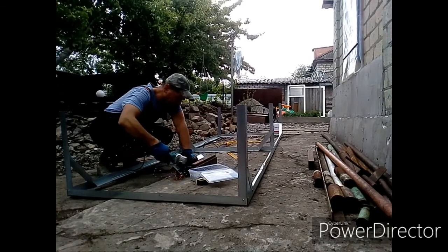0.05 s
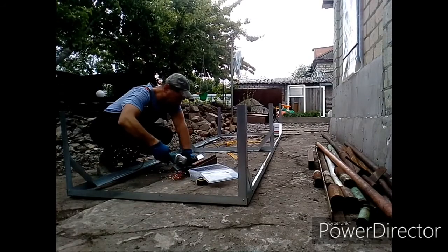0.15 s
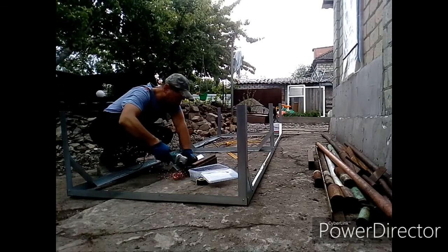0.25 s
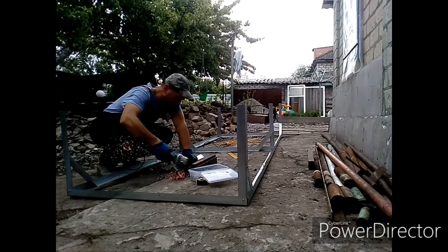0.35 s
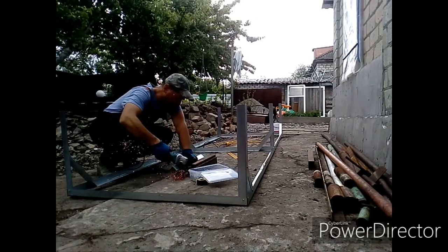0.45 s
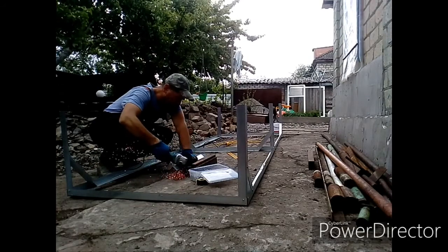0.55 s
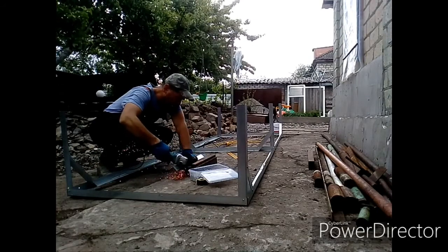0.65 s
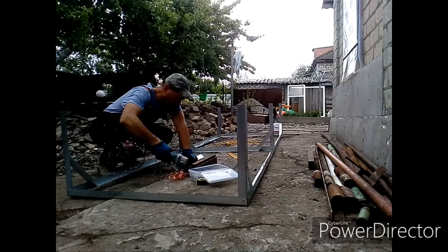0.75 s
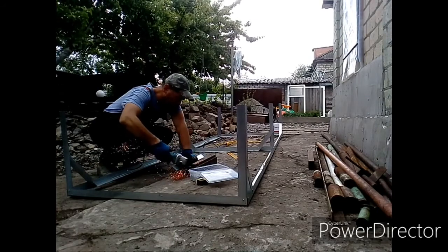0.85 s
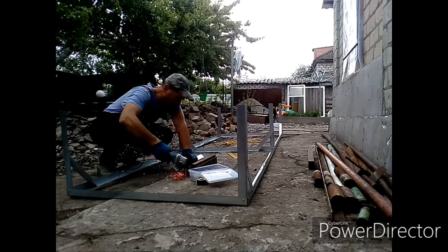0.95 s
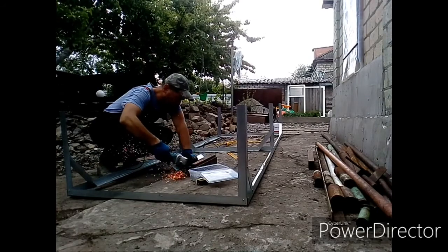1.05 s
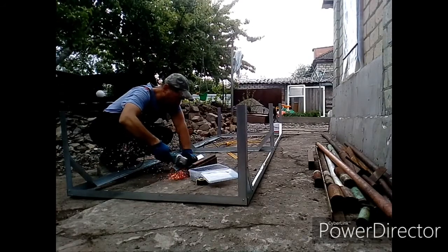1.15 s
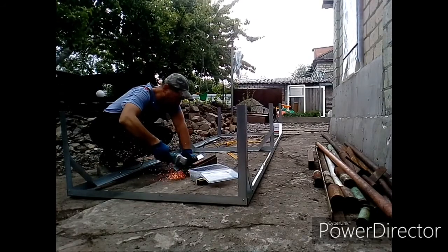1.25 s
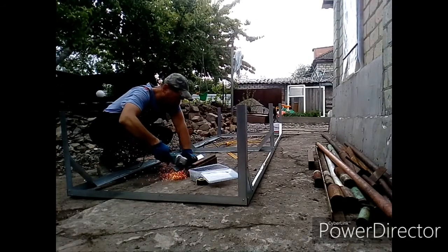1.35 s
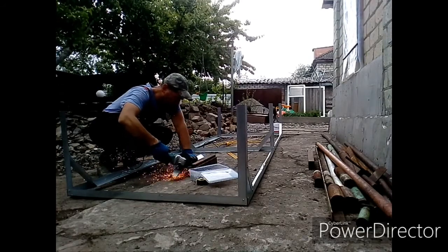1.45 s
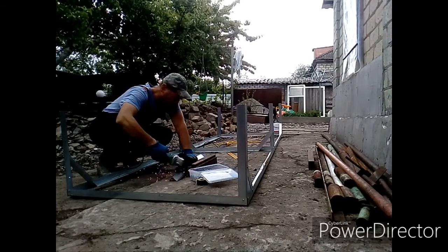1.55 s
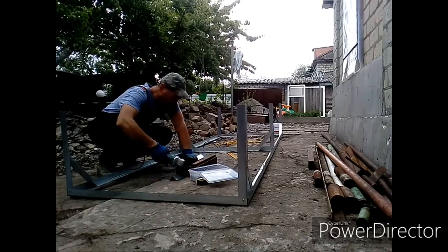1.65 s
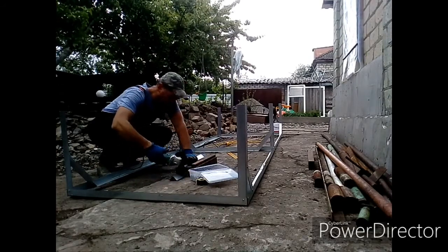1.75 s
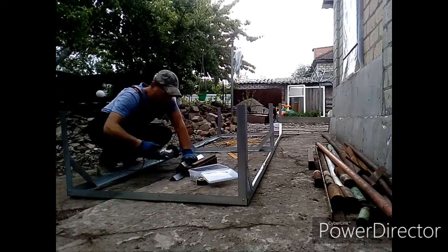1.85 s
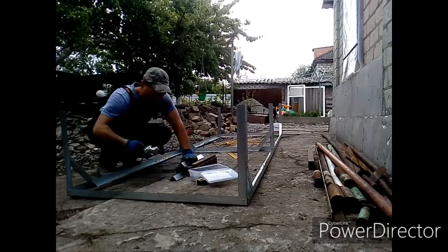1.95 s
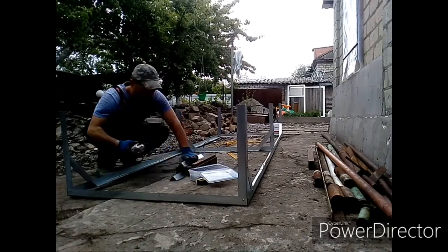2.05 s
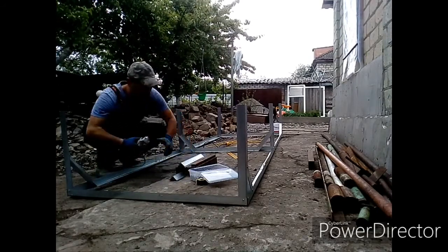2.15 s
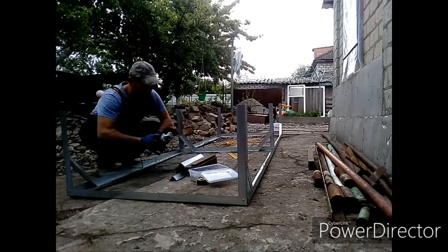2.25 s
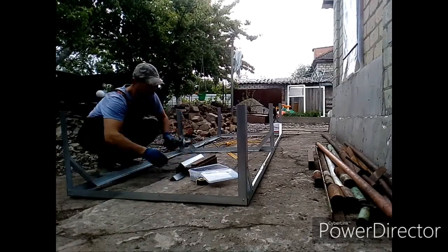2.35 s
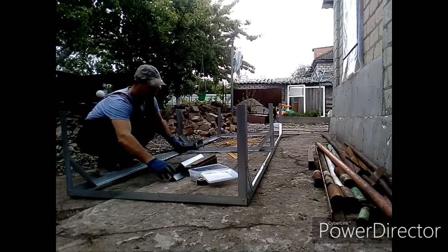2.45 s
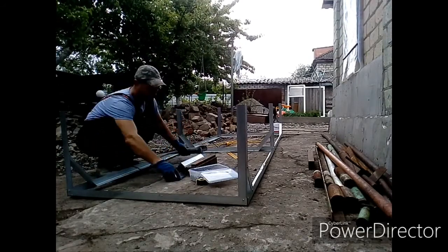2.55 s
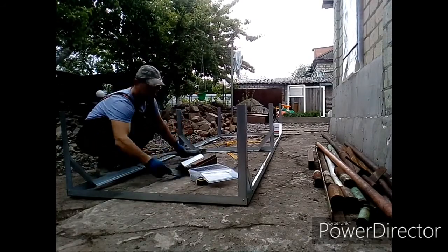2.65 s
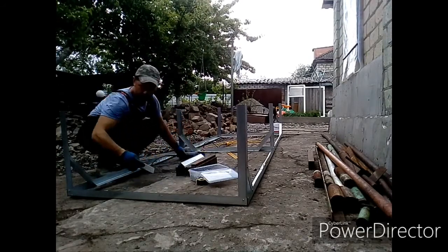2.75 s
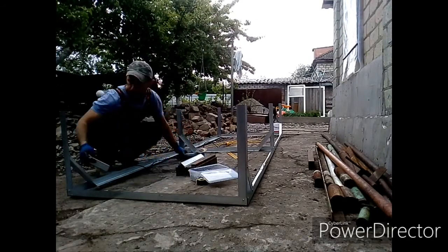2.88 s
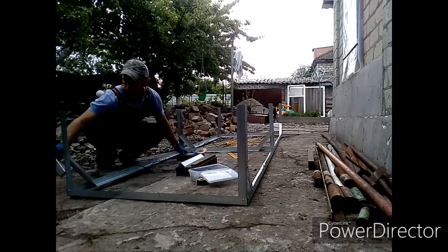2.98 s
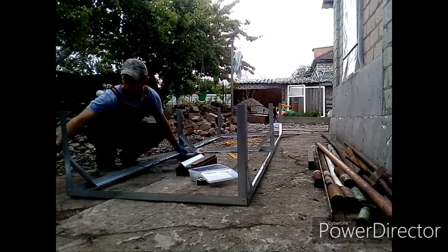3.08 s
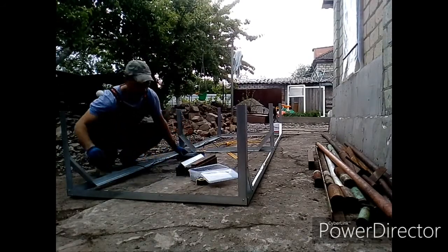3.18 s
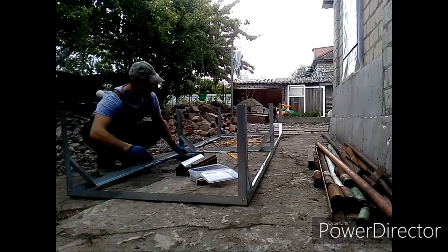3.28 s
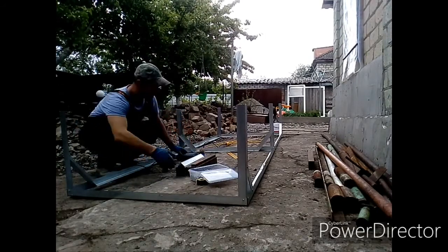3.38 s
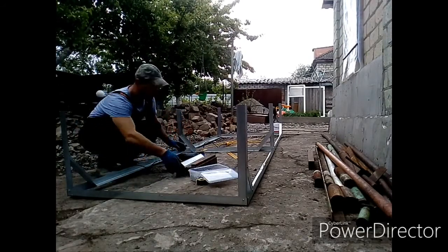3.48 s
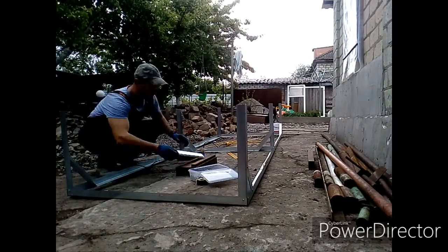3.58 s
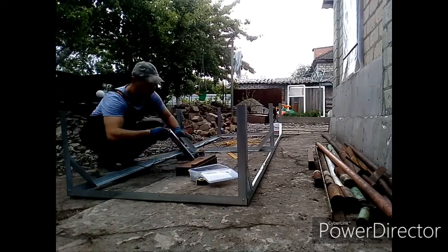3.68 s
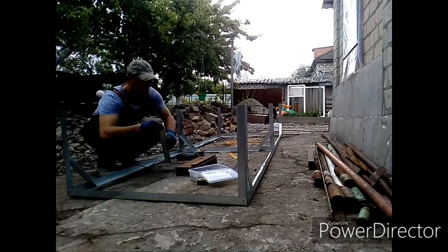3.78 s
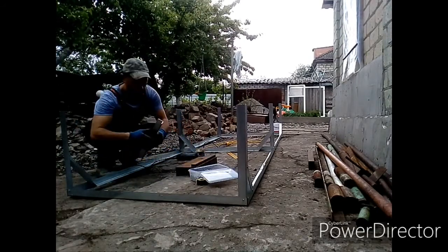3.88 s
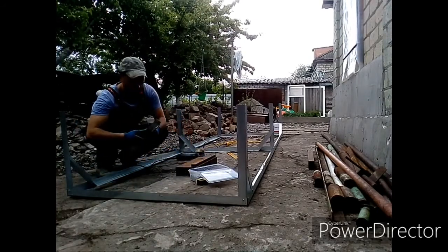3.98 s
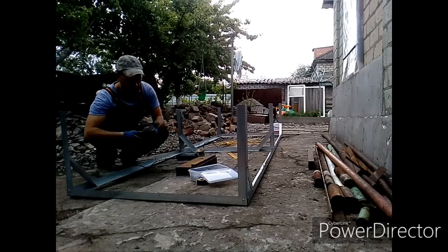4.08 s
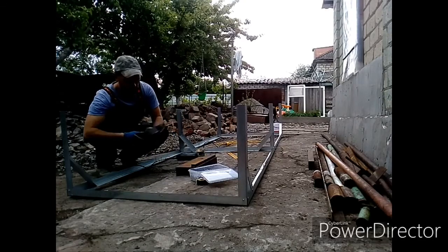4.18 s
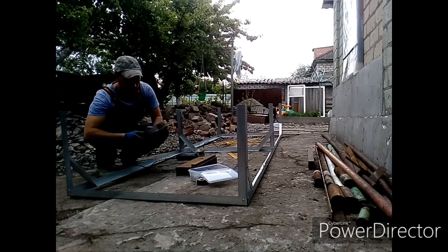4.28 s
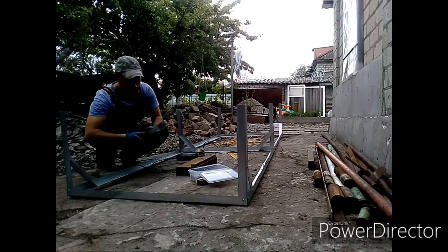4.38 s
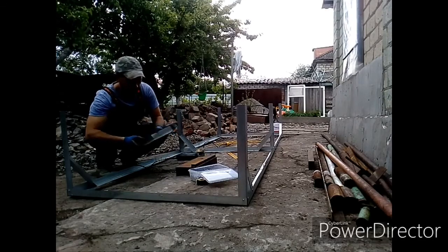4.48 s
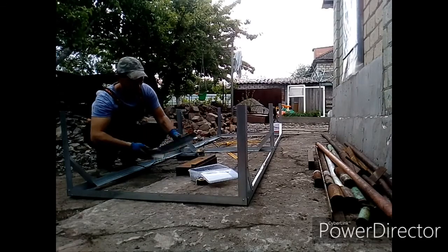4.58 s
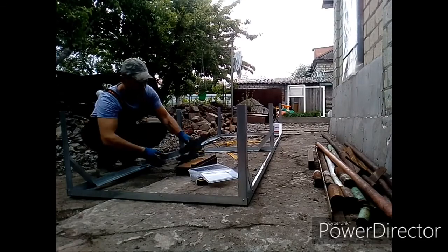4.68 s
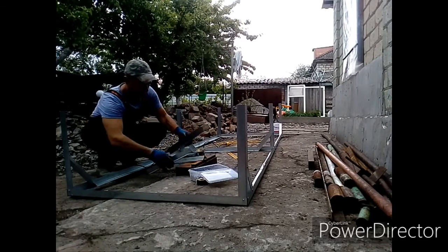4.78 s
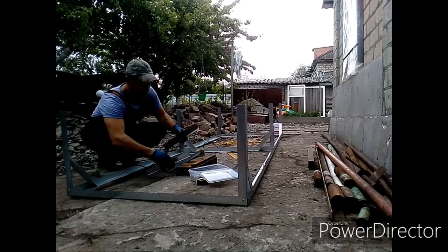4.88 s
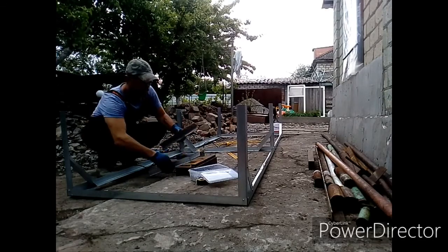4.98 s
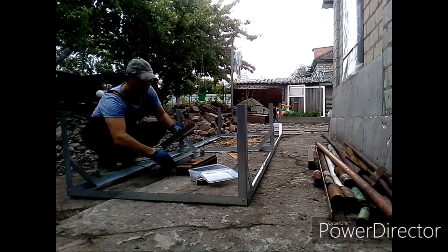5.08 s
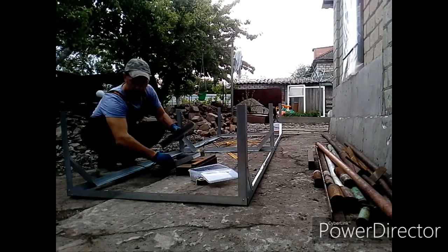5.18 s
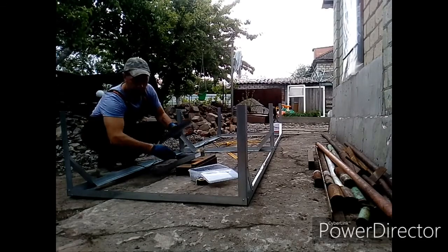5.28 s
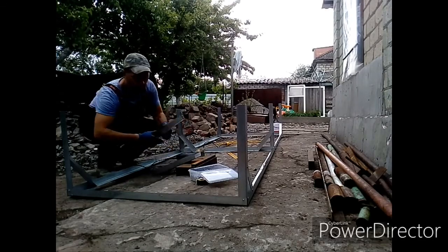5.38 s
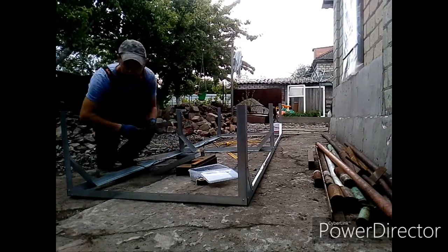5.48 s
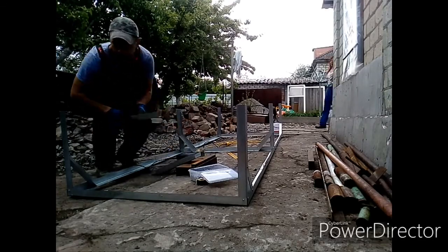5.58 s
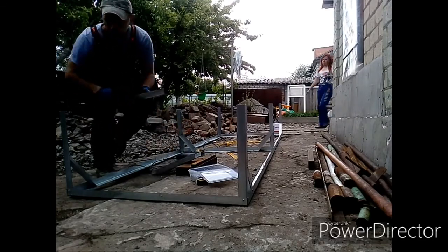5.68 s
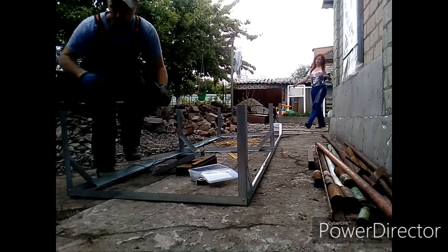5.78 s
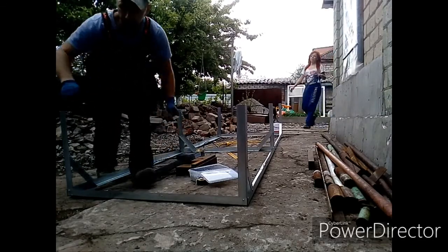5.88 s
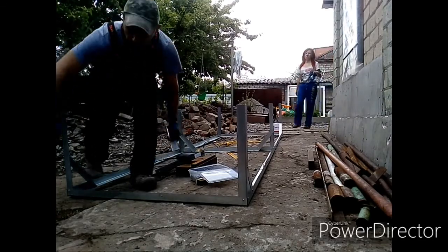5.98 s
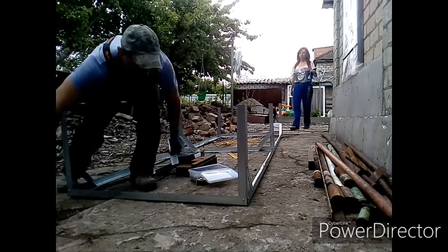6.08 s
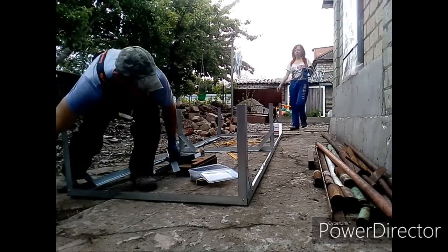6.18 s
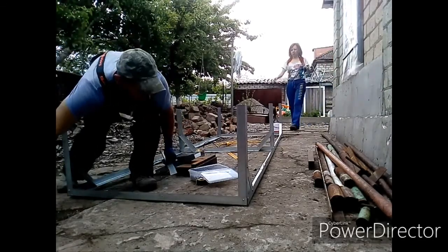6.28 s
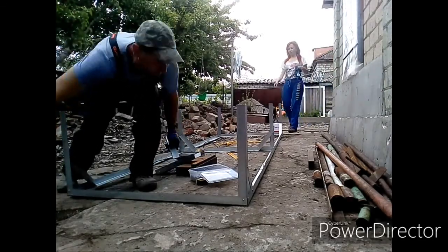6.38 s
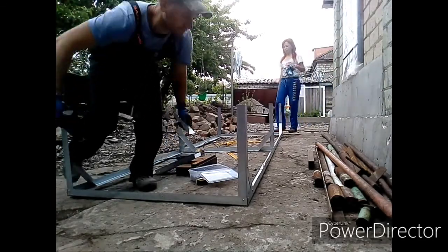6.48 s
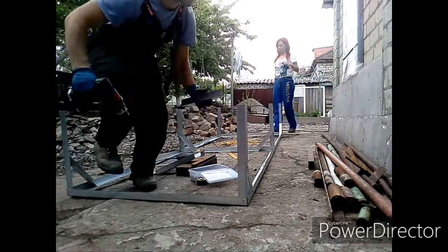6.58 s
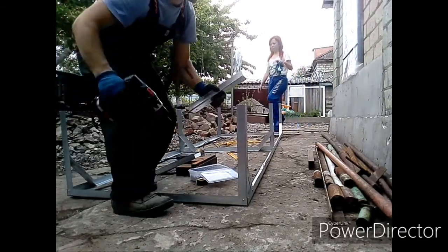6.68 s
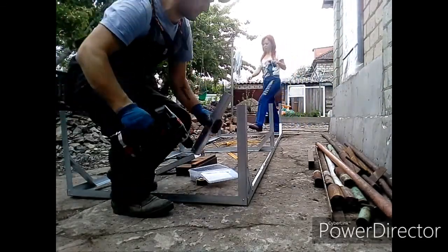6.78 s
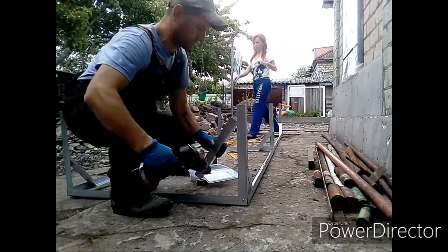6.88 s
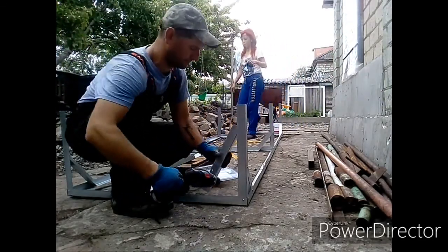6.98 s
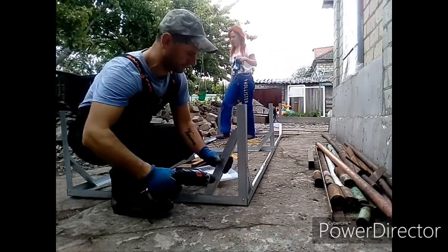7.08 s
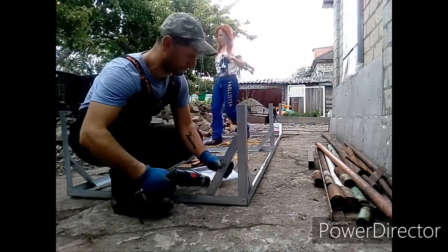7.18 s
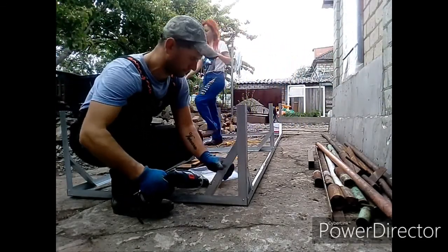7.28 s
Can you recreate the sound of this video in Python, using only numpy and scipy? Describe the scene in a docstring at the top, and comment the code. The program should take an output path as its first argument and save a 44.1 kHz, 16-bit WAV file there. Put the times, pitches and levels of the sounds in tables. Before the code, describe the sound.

Outdoors in a walled yard, an angle grinder screeches through a steel profile, its pitch rising as the cut gives way. It spins down with a falling whine, hiss and dry bearing squeal, and skids briefly on the ground. Light metal slides follow, then a bright uneven scrape on concrete that rings out. Boots thud and scuff closer to the microphone over a faint distant hum.

```python
"""In a walled yard an angle grinder finishes a cut through a steel profile, coasts down and is laid down.
The cut piece is picked up and scraped on concrete until it rings; then boots shift and step closer.
A distant machine hums, faintly at first and then louder, in steady outdoor air.
Grinding and rubbing are random grains exciting steel resonances; the motor's tones follow its speed.
Ringing steel is made of decaying tones, and footsteps are short bursts of coloured noise."""
import sys
import numpy as np
from scipy import signal
from scipy.fft import rfft, irfft, next_fast_len
from scipy.io import wavfile
from scipy.ndimage import uniform_filter1d, map_coordinates

SR = 44100
rng = np.random.default_rng(int(sys.argv[2]) if len(sys.argv) > 2 else 0)


def wrap_up_sound(samples):
    """Save the sound to the file named by the first command line argument, as 16-bit audio."""
    columns = np.atleast_2d(samples).T
    # keep every value between -1 and 1, then stretch to whole-number steps
    tamed = np.clip(columns, -1, 1)
    steps = np.round(tamed * 32767).astype(np.int16)
    wavfile.write(sys.argv[1], SR, steps)


N = 323686
TIME = np.arange(N) / SR  # seconds
HZ = np.maximum(np.arange(N // 2 + 1) * SR / N, 1)
# Levels in the tables are starting points: trims, chance and panning in the functions still act on them.


def from_db(db):
    """Decibels to gain."""
    return 10 ** (np.asarray(db) / 20)


def rms_one(x):
    """Scale to unit power."""
    return x / np.sqrt(np.mean(x ** 2) + 1e-20)


def curve(rows, axis=1):
    """One column of a table, joined by straight lines in time."""
    rows = np.array(rows)
    return np.interp(TIME, rows[:, 0], rows[:, axis])


def at_hz(points, hz=HZ):
    """A spectrum joined by lines on a log-frequency axis."""
    points = np.array(points)
    return np.interp(np.log(hz), np.log(points[:, 0]), points[:, 1])


def colour_gain(points):
    """Gain per frequency from a table in dB."""
    return from_db(at_hz(points))


def rise(start_s, attack_s):
    """A smooth step from 0 to 1."""
    return np.sin(np.pi / 2 * np.clip((TIME - start_s) / attack_s, 0, 1)) ** 2


def release(end_s, t60):
    """Full strength until the end, then a decay that loses 60 dB in t60 seconds."""
    return from_db(-60 * np.clip((TIME - end_s) / t60, 0, 3))


def gestures(rows, t60, axis=3):
    """Attack, hold and release of every row; overlapping ones add in power."""
    power = 0
    for row in rows:
        release_s = sum(row[:3])  # start + attack + hold
        power = power + (from_db(row[axis]) * rise(row[0], row[1]) * release(release_s, t60)) ** 2
    return np.sqrt(power)


def blows(rows):
    """Envelope of sudden blows (s, dB, t60 s), each dying away for at most half a second."""
    out = np.zeros(N)
    for s, db, t60 in rows:
        tail = out[int(s * SR):][:SR // 2]
        tail += from_db(db - 60 * TIME[:len(tail)] / t60)
    return out


def white():
    """Two unrelated noises."""
    return rng.standard_normal((2, N))


def drift(rate):
    """Smooth chance with spread 1; a higher rate in Hz wanders faster."""
    r = np.exp(-40 * np.pi * rate / SR)  # made at a twentieth of the sample rate
    slow = signal.lfilter([1], [1, -2 * r, r * r], rng.standard_normal(N // 20 + 4002))
    slow = slow[4000:]  # skip the filter's start
    return np.interp(np.arange(N) / 20, np.arange(len(slow)), rms_one(slow))


def grit(per_s, spread_db):
    """Random fractures of grains, a few much larger than the rest."""
    sizes = from_db(spread_db * np.minimum(rng.exponential(1, N), 5))
    return rms_one(white() * sizes * (rng.random(N) < per_s / SR))


def low_share(edge_hz):
    """Gain per frequency of a steep low-pass."""
    return 1 / np.sqrt(1 + (HZ / edge_hz) ** 8)


def high_share(edge_hz):
    """What the low-pass leaves over, in power."""
    return np.sqrt(1 - low_share(edge_hz) ** 2)


def shaped(x, gain):
    """Filter a steady sound by a gain per frequency; unit power."""
    size = next_fast_len(N, True)
    gain = np.interp(np.arange(size // 2 + 1) * SR / size, HZ, gain)
    return rms_one(irfft(rfft(x, size) * gain, size)[..., :N])


def resonances(modes):
    """Strength per frequency of a body with these modes."""
    return np.sqrt(sum(from_db(db) ** 2 / (1 + ((HZ ** 2 - hz ** 2) / (HZ * width)) ** 2)
                       for hz, width, db in modes))


def body(colour, modes, lift_db):
    """A broad colour out of which narrow resonances stand."""
    relief = 1 + (from_db(lift_db) * resonances(modes)) ** 2
    return colour_gain(colour) * np.sqrt(relief / uniform_filter1d(relief, size=12001))


# How alike left and right are.
# Each row: frequency in Hz, correlation (1 is the same, 0 unrelated, below 0 opposed).
LEFT_RIGHT_LIKENESS = [(100, 0.92), (300, 0.76), (700, 0.15), (1400, 0.54), (2800, -0.37), (5000, 0.37),
                       (9000, -0.31), (14000, 0.03)]


def stereo(pair, gain, balance=((100, 0), (10000, 0))):
    """Two unrelated signals become left and right, as alike as the table says at each frequency."""
    alike, lean = np.clip(at_hz(LEFT_RIGHT_LIKENESS), -.95, .95), from_db(at_hz(balance) / 2)
    size = next_fast_len(N, True)
    hz = np.arange(size // 2 + 1) * SR / size
    alike, lean, gain = (np.interp(hz, HZ, v) for v in (alike, lean, gain))
    mid, side = rfft(pair, size) * gain
    side = side * np.sqrt((1 - alike) / (1 + alike))
    out = irfft(np.array([(mid + side) * lean, (mid - side) / lean]), size)[:, :N]
    return out / np.std(out.mean(0))


def pan(x, left_db):
    """Lean a source to the left by this many dB in all."""
    return x * from_db([[left_db / 2], [-left_db / 2]])


def ringing(force, t60, wet_db, shift_rate, uneven_db):
    """Countless modes of unequal strength; which ones answer shifts as the contact point moves."""
    t = TIME[:SR // 5]
    place = 1.65 * drift(shift_rate)
    out = force
    for weight in (np.cos(place), np.sin(place)):
        spectrum = rfft(rng.standard_normal((2, len(t))))
        strength = rms_one(uniform_filter1d(rng.standard_normal(spectrum.shape[1]), size=14))
        uneven = from_db(uneven_db * np.clip(strength, -3, 1.5))
        tail = irfft(spectrum * uneven, len(t)) * from_db(-60 * t / t60)
        tail = tail / np.sqrt(np.sum(tail ** 2) / 2)
        out = out + from_db(wet_db) * signal.fftconvolve(force * weight, tail, axes=1)[:, :N]
    return rms_one(out)


def singing(modes, wander_db, wander_rate):
    """Rubbed modes of steel; each swells and fades by itself as the contact point moves."""
    out = 0
    for hz, width, db in modes:
        tone = signal.lfilter(*signal.iirpeak(hz, hz / width, fs=SR), white())
        out = out + tone * from_db(db + wander_db * np.clip(drift(wander_rate), -2, 2))
    return out / np.std(out.mean(0))


# The disc labours in the cut and speeds up as the steel gives way.
# Each row: time in seconds, disc turns per second.
DISC_SPEED = [(0.0, 160), (0.04, 164), (0.1, 167.5), (0.16, 172.5), (0.24, 175.4), (0.34, 173),
              (0.405, 169), (0.475, 174), (0.525, 172.7), (0.59, 177), (0.69, 173.8), (0.81, 174),
              (0.89, 177.8), (0.94, 176.4), (1.0, 180.2), (1.055, 181.6), (1.12, 179.2), (1.36, 184),
              (1.49, 188.3), (1.55, 195), (1.6, 202)]
GEAR_RATIO = 3.72  # armature turns per turn of the disc
OFF_S, OFF_TURNS_PER_S = 1.55, 700.7  # switch-off, and the armature speed where the coasting curve starts
DRAG_TIME_S, FRICTION_HZ_PER_S = 2.25, 165.1  # air drag and bearing friction


def rotor_speed():
    """Armature turns per second: held back by the cut, then coasting against drag and friction."""
    friction = FRICTION_HZ_PER_S * DRAG_TIME_S
    coasting = (OFF_TURNS_PER_S + friction) * np.exp((OFF_S - TIME) / DRAG_TIME_S) - friction
    in_cut = TIME < DISC_SPEED[-1][0]
    return np.where(in_cut, curve(DISC_SPEED) * GEAR_RATIO, np.maximum(coasting, 1))


def rotor_turns(speed, wobble=0.0012):
    """Angle of the armature in turns, and of the disc behind the bevel gear."""
    turns = np.cumsum(speed * (1 + wobble * drift(25.5))) / SR
    return turns, turns / GEAR_RATIO


# Colour of the cut. Each row: frequency in Hz, level in dB per Hz.
CUT_COLOUR = [(440, -35.5), (750, -30), (1200, -18.5), (1470, -20), (1590, -15.5), (2250, -18),
              (2680, -17.5), (3130, -21), (3750, -12.5), (4530, -7), (5140, -21), (5770, -2), (6990, -5.5),
              (12100, -2.5), (14800, -9), (15800, -17.5)]
# Resonances of the clamped steel. Each row: frequency in Hz, width in Hz, level in dB.
CLAMPED_STEEL_MODES = [(4630, 260, -1.5), (5380, 330, -4.5), (6400, 39, -5), (7570, 30, -7),
                       (7720, 140, -11.5), (9000, 75, -15.5), (9930, 460, -7.5), (11270, 39, 0),
                       (12240, 31, 5.5), (11700, 47, -2), (12060, 22, -7), (12680, 600, 1),
                       (13000, 260, -4.5)]
# Which side the cut leans to. Each row: frequency in Hz, left minus right in dB.
CUT_BALANCE = [(60, 2.5), (110, 5), (200, 13), (380, -5.5), (700, -0.5), (1290, -6), (2380, -2), (4400, 2),
               (8120, 5.5), (15000, -2)]
# The low growl of the cut. Each row: time in seconds, level in dB.
GROWL_LEVEL = [(0.0, -35.5), (0.448, -34), (0.634, -37), (0.888, -34.5), (0.962, -38.5), (1.164, -35.5),
               (1.294, -39.5), (1.402, -33.5), (1.55, -35.5)]
# level of the screech, moment the disc breaks through, and how fast the cut then dies away
CUT_DB, THROUGH_S, CUT_RELEASE_T60_S = -21, 1.57, 0.46


def cutting(disc, fresh_db=-7.0, rumble_db=-11, throb=0.07, lift_db=8, growl_db=-3.5):
    """The same rim grains pass every turn, slowly wearing away, and set the steel ringing."""
    points, kept = 256, .68  # points around the rim; how much of it lasts from turn to turn
    rim = rng.standard_normal((2, int(disc[-1]) + 22, points))
    rim = signal.lfilter([1], [1, -2 * kept, kept ** 2], rim, axis=1)[:, 20:]
    bite = rms_one(np.array([map_coordinates(r.ravel(), [disc * points], order=3) for r in rim]))
    sparks = shaped(grit(14000, 1.6), 1 - low_share(2250))
    rumble = shaped(white(), low_share(2300))
    force = bite + from_db(fresh_db) * sparks + from_db(rumble_db) * rumble
    # the disc runs slightly out of true and presses harder once a turn
    force = force * (1 + throb * np.cos(2 * np.pi * disc))
    force = ringing(force, t60=0.28, wet_db=-4.0, shift_rate=1.49, uneven_db=-4.5)
    steel = body(CUT_COLOUR, CLAMPED_STEEL_MODES, lift_db)
    screech = stereo(force, steel * high_share(3070), CUT_BALANCE)
    growl = stereo(force, steel * low_share(3070), CUT_BALANCE)
    # set both levels by their strength before the breakthrough
    screech, growl = (x / np.std(x.mean(0)[TIME < THROUGH_S]) for x in (screech, growl))
    screech = screech * from_db(CUT_DB + 0.1117 * drift(29.84))
    growl = growl * from_db(curve(GROWL_LEVEL) + growl_db)
    return (screech + growl) * release(THROUGH_S, CUT_RELEASE_T60_S)


# Overtones of the turning rim. Each row: multiple of the disc speed, level in dB.
BUZZ_OVERTONES = [(7, -29), (9, -21.5), (12, -16), (15, -16.5), (18, -14), (22, -19.5), (25, -9),
                  (28, -4.5), (33, -5.5), (37, -18.5)]
BUZZ_DB = -40


def disc_buzz(disc, waver_db=6.0, rough_db=3.5, jitter=0.45, flare_db=4, flare_s=0.096):
    """The rim strikes the steel nearly alike each turn: a hard buzz that flares at the breakthrough."""
    orders, levels = np.transpose(BUZZ_OVERTONES)
    out = np.zeros((2, N))
    cut = TIME < THROUGH_S + CUT_RELEASE_T60_S
    for k in range(7, 41):
        # every overtone comes and goes by itself
        waver = np.minimum(waver_db * drift(5.3) + rough_db * drift(55), 6)[cut]
        level_db = BUZZ_DB + np.interp(k, orders, levels) + waver
        angle = 2 * np.pi * (k * disc[cut] + rng.random((2, 1))) + jitter * drift(48)[cut]
        out[:, cut] += 2 * np.sin(angle) * from_db(level_db)
    flare = from_db(flare_db * rise(THROUGH_S - flare_s, flare_s))
    return pan(out, 1.1) * flare * release(THROUGH_S, t60=0.051)


# Steel modes that flare up in the cut. Each row: frequency in Hz, width in Hz, level in dB.
CUT_SINGING_MODES = [(4617, 52, 1.5), (5820, 59, -1.5), (5960, 72, 2.5), (7320, 29, 0), (7890, 41, 3),
                     (8360, 38, -4), (8810, 95, -3.5), (10080, 140, 2), (11270, 35, 1), (12580, 120, -5)]


def cut_singing(sing_db=-28):
    """Single modes of the clamped steel flare up and fade under the disc."""
    song = singing(CUT_SINGING_MODES, wander_db=3.5, wander_rate=9.0)
    return pan(song, 2.5) * from_db(sing_db) * rise(0, attack_s=0.16) * release(THROUGH_S, t60=0.24)


DRONE_DB, EASES_S, EASING_DB_PER_S = -54.5, 0.62, 8.5  # the drone weakens once the cut eases


def armature_drone(rotor):
    """The armature drones under load, once and twice per turn."""
    angle = 2 * np.pi * rotor
    level_db = DRONE_DB - EASING_DB_PER_S * np.maximum(TIME - EASES_S, 0) + 2 * drift(10.7)
    tone = np.sin(angle) + 0.98 * np.sin(2 * angle)
    return tone * from_db(level_db) * release(THROUGH_S, CUT_RELEASE_T60_S)


FREE_S, HISS_ENDS_S = 1.6, 3.395  # the disc spins free; later the fan dies away
TONES_END_S = 4.1  # the whine and the rush of air are cut off


def free_running():
    """Loudness outline of the grinder running free of the cut."""
    return rise(FREE_S, attack_s=0.045) * release(HISS_ENDS_S, t60=1.0)


# Colour of the fan and brush hiss. Each row: frequency in Hz, level in dB per Hz.
HISS_COLOUR = [(1590, -48), (2700, -14.5), (3020, -5.5), (4500, -4.5), (4810, -4), (5950, 0), (7380, -3.5),
               (8490, 4), (9490, -4.5), (10300, 2.5), (11100, -0.5), (12900, 2), (15200, -12), (15800, -29)]
# Each row: time in seconds, level of the hiss in dB.
HISS_LEVEL = [(1.63, -22), (1.754, -25.5), (2.256, -29), (2.59, -40), (3.17, -46.5)]


def fan_hiss():
    """Fan and brushes hiss: dense tiny clicks with a short ringing."""
    brushes = ringing(grit(14000, 0.33), t60=0.039, wet_db=-2.5, shift_rate=7.2, uneven_db=-5.5)
    hiss = stereo(brushes, colour_gain(HISS_COLOUR)) * from_db(curve(HISS_LEVEL))
    return pan(hiss * free_running(), 1.1)


# Colour of the gear noise. Each row: frequency in Hz, level in dB per Hz.
GEAR_COLOUR = [(110, -47), (180, -21.5), (216, -16), (290, -1.5), (324, -19), (477, -22), (717, -14.5),
               (889, -10), (985, -4), (1210, -3.5), (1450, -8.5), (2200, 2), (2700, -12), (3510, -43),
               (5940, -120)]
GEAR_DB, GEAR_LOSS_DB = -36, 11  # level at the switch-off speed, loss per halving of speed


def gear_rattle(disc, halvings):
    """Gear noise throbs once per disc turn and fades with speed."""
    throbbing = white() * (1 + .5 * np.cos(2 * np.pi * disc))
    rattle = ringing(throbbing, t60=0.059, wet_db=4.0, shift_rate=1.55, uneven_db=0.0)
    gears = stereo(rattle, colour_gain(GEAR_COLOUR)) * from_db(GEAR_DB - GEAR_LOSS_DB * halvings)
    return pan(gears * free_running(), -4.5)


WHINE_DB, WHINE_LOSS_DB, WHINE_FROM_S = -44, 10.5, 1.74  # loss is per halving of speed


def coasting_whine(rotor, halvings, flutter):
    """The coasting armature whines twice per turn, falling in pitch and level."""
    whine = np.sqrt(2) * np.sin(4 * np.pi * rotor + flutter)
    whine = whine * from_db(WHINE_DB - WHINE_LOSS_DB * halvings + 2.92 * drift(30) + 2 * drift(4))
    return whine * rise(WHINE_FROM_S, attack_s=0.089) * release(TONES_END_S, t60=.05)


# The bevel gear passes a resonance.
# Each row: start in seconds, attack in seconds, hold in seconds, level in dB.
GEAR_TONE = [(2.09, 0.073, 0.19, -47)]
GEAR_TONE_ORDER = 10.35  # multiple of the disc speed


def gear_tone(disc, flutter):
    """The bevel gear sings while it passes a resonance."""
    tone = np.sin(2 * np.pi * GEAR_TONE_ORDER * disc + flutter)
    return tone * gestures(GEAR_TONE, t60=0.2) * from_db(2 * drift(25))


# Times of the whistle. Each row: start in seconds, attack in seconds, hold in seconds, level in dB.
WHISTLE = [(2.76, .04, 0.125, -50)]


def commutator_whistle(rotor):
    """A commutator whistle, 62.3 times the armature speed, sinks into hearing."""
    return np.sin(62.3 * 2 * np.pi * rotor + 1.3 * drift(120)) * gestures(WHISTLE, t60=.15)


# Times the guard and the gear case ring.
# Each row: start in seconds, attack in seconds, hold in seconds, level in dB.
GUARD_RING = [(1.74, 0.026, 0.14, -41.5)]
CASE_RING = [(1.8, 0.1, 0.42, -48.5)]
# Their resonances. Each row: frequency in Hz, width in Hz, level in dB.
GUARD_MODES = [(1235, 40, 1.5), (1140, 76, -1), (976, 43, -2)]
CASE_MODES = [(1960, 140, 9.5), (2050, 190, -1)]


def guard_and_case():
    """The falling whine passes the guard's modes and the gear case hums along: noise in narrow bands."""
    guard = stereo(white(), resonances(GUARD_MODES) ** 2) * gestures(GUARD_RING, t60=0.43)
    case = stereo(white(), resonances(CASE_MODES) ** 2) * gestures(CASE_RING, t60=.6)
    return pan(guard + case, -4)


# Centre of the rush of air. Each row: time in seconds, frequency in Hz.
RUSH_PITCH = [(1.6, 8800), (1.8, 8780), (1.95, 8770), (2.08, 8450), (2.35, 8100), (2.6, 8400)]
RUSH_LOSS_DB = 13  # per halving of speed


def air_rush(halvings, rush_db=-35, width_hz=170):
    """A narrow rush of air from the vents drifts in pitch and fades as the rotor slows."""
    angle = 2 * np.pi * np.cumsum(curve(RUSH_PITCH)) / SR
    rush = np.array([drift(width_hz) * np.cos(angle) + drift(width_hz) * np.sin(angle)
                     for side in range(2)])
    level = from_db(rush_db - RUSH_LOSS_DB * halvings)
    return rush * level * rise(FREE_S, attack_s=.06) * release(TONES_END_S, t60=.1)


# The dry bearings at low speed. Each row: time in seconds, level in dB.
BEARING_LEVEL = [(1.5, -77), (2.4, -51.5), (2.7, -44), (3.15, -51), (3.45, -56), (3.68, -57), (3.9, -100)]
# Their resonances. Each row: frequency in Hz, width in Hz, level in dB.
BEARING_MODES = [(1412, 180, -1.5), (2050, 340, -11.5), (2990, 1100, -21.5), (5130, 2160, -11)]


def dry_bearings():
    """Dry bearings rub: noise through broad resonances."""
    return pan(stereo(white(), resonances(BEARING_MODES)) * from_db(curve(BEARING_LEVEL)), 1.1)


# The bearings squeal. Each row: start in seconds, attack in seconds, hold in seconds, level in dB.
SQUEALS = [(2.45, 0.1, 0.22, -61), (2.78, 0.058, 0.32, -45.5), (3.3, 0.033, 0.26, -54.5)]
# Each row: frequency in Hz, width in Hz, level in dB.
SQUEAL_MODES = [(8730, 130, 4), (12000, 200, -14)]


def bearing_squeal():
    """The dry bearings squeal once the rotor runs slowly: noise in high resonances."""
    squeal = pan(stereo(white(), resonances(SQUEAL_MODES)), 5.1)
    return squeal * gestures(SQUEALS, t60=.3) * from_db(1.6 * drift(35))


# The slow disc catches on the ground.
# Each row: start in seconds, attack in seconds, hold in seconds, level in dB, level of the low part in dB.
SKIDS = [(3.185, 0.0008, 0.021, -22, -41.5), (3.206, 0.0053, 0.02, -20.5, -35.5),
         (3.24, .008, 0.026, -27.5, -37.5), (3.272, 0.0051, 0.012, -24.5, -34)]
# Each row: frequency in Hz, level in dB per Hz.
SKID_COLOUR = [(290, -67.5), (500, -29.5), (697, -32.5), (1110, -24.5), (1680, -20.5), (2050, -18.5),
               (2520, -24.5), (3450, -15.5), (3850, -18.5), (4300, -4), (5200, -6.5), (6550, -7),
               (6900, 2.5), (8150, 1), (8500, -2.5), (14700, -6), (15800, -38)]
# Each row: frequency in Hz, width in Hz, level in dB.
SKID_MODES = [(1767, 30, -16), (4280, 180, 0), (7800, 80, -8.5), (8760, 130, -3), (9700, 110, -1),
              (9840, 43, -4), (12000, 130, -16), (13200, 112, -2.5)]
SKID_T60_S = 0.26


def skid():
    """The slowing disc scratches over the ground in uneven jerks."""
    force = ringing(grit(14000, 1.2), t60=0.086, wet_db=2.5, shift_rate=2.6, uneven_db=1.5)
    force = force * from_db(1.05 * drift(90))
    steel = body(SKID_COLOUR, SKID_MODES, lift_db=3.0)
    scratch = stereo(force, steel * high_share(5200)) * gestures(SKIDS, SKID_T60_S)
    grind = stereo(force, steel * low_share(5200) * low_share(4250)) * gestures(SKIDS, SKID_T60_S, axis=4)
    return pan(scratch, 2.2) + grind


# Steel edge drawn over concrete.
# Each row: start in seconds, attack in seconds, hold in seconds, level in dB, level of the low part in dB.
STROKES = [(4.777, 0.0042, 0.094, -35.5, -41.5), (4.785, 0.09, 0.052, -25, -49),
           (4.965, 0.038, 0.053, -33, -48.5), (5.075, 0.0052, 0.015, -26, -41.5),
           (5.134, 0.0017, 0.033, -24.5, -40.5), (5.165, 0.011, 0.064, -23.5, -40),
           (5.22, 0.036, 0.042, -26.5, -44.5), (5.327, 0.0098, 0.059, -25.5, -39.5),
           (5.42, 0.011, 0.0086, -31.5, -53)]
# Each row: frequency in Hz, level in dB per Hz.
STROKE_COLOUR = [(60, -57), (240, -21.5), (400, -29), (812, -27), (1050, -13), (1210, -12.5), (1410, -19),
                 (2570, -15.5), (2820, -13), (4620, 1), (5470, -1), (6090, 8.5), (6570, -2), (7100, 4),
                 (8700, 0), (10300, -3), (12700, -0.5), (15800, -10)]
# The piece flexes under the stroke. Each row: frequency in Hz, width in Hz, level in dB.
BENDING_MODES = [(1213, 34, -4), (1557, 70, -9.5)]
# Modes rubbed by the stroke. Each row: frequency in Hz, width in Hz, level in dB.
STROKE_MODES = [(2913, 21, -2.5), (3490, 30, -5.5), (4620, 18, 0), (4800, 25, -4), (5740, 41, -12),
                (6090, 44, 3), (6600, 14, 0), (6890, 17, 3), (7015, 28, 10.5), (7330, 29, 3), (7500, 22, 0),
                (7870, 80, 0), (8600, 64, -7), (10330, 140, -0.5), (11100, 27, 3)]
# The piece rings freely. Each row: frequency in Hz, level in dB, time to fall 60 dB in seconds.
PIECE_TONES = [(2360, -5, 0.81), (3840, -14, 0.98), (5243, -13, 0.56), (6800, 0, 0.37), (8716, -6, 0.46),
               (9640, -10, 0.78), (9938, -2, 0.38), (10910, -12, 0.87), (12240, -15, 0.4)]
# The edge grips and squeaks. Each row: start in seconds, attack in seconds, hold in seconds, level in dB.
SQUEAKS = [(5.17, 0.015, 0.042, -38), (5.34, 0.015, 0.035, -35)]
# Each row: frequency in Hz, width in Hz, level in dB.
SQUEAK_MODES = [(2830, 90, 0), (1550, 50, 2), (4680, 46, 5)]
STROKE_T60_S = 0.2


def scraping(ring_db=-29, rasp_db=-2.5, sing_db=-3.0, groan_db=-1.5, bend_db=-4):
    """Concrete grains chatter against the steel edge; its free modes ring on after the stroke."""
    pressure = gestures(STROKES, STROKE_T60_S)
    force = grit(4500, 1.1) * from_db(2.0 * drift(120))
    force = ringing(force, t60=0.2, wet_db=5.5, shift_rate=3.6, uneven_db=4.0)
    steel = colour_gain(STROKE_COLOUR)
    song = from_db(sing_db) * singing(STROKE_MODES, wander_db=6.0, wander_rate=9.2)
    rasp = (from_db(rasp_db) * stereo(force, steel * high_share(1880)) + song) * pressure
    bending = stereo(white(), resonances(BENDING_MODES) ** 2) * from_db(bend_db + 3.9 * drift(12))
    groan = from_db(groan_db) * stereo(force, steel * low_share(1880)) + bending
    groan = groan * gestures(STROKES, STROKE_T60_S, axis=4)
    drive, rings = white() * pressure + 1e-18, 0
    for hz, db, t60 in PIECE_TONES:
        r, w = from_db(-60 / (t60 * SR)), 2 * np.pi * hz / SR  # loss and turn per sample
        tone = signal.lfilter([0, np.sin(w)], [1, -2 * r * np.cos(w), r * r], drive)
        rings = rings + from_db(db) * np.sqrt(1 - r * r) * tone
    squeak = singing(SQUEAK_MODES, wander_db=2.5, wander_rate=12.0) * gestures(SQUEAKS, t60=.2)
    return pan(rasp + squeak + from_db(ring_db) * rings, 2.7) + pan(groan, -4.0)


LIFT_S, LIFT_DB = 5.41, -44.5  # the piece leaves the ground


def free_ring():
    """Lifted clear of the ground, the piece rings on in clean tones."""
    tones = 0
    for hz, db, t60 in PIECE_TONES:
        tone = np.sin(2 * np.pi * (hz * TIME + rng.random()))
        tones = tones + from_db(LIFT_DB + db) * tone * release(LIFT_S, t60)
    return pan(tones, 2.4) * rise(LIFT_S, attack_s=.01)


# A hard edge strikes the concrete. Each row: time in seconds, level in dB, time to fall 60 dB in seconds.
CLANKS = [(5.077, -27.5, 0.33)]
# Each row: frequency in Hz, width in Hz, level in dB.
CLANK_MODES = [(3380, 490, -7), (4330, 310, -3), (4560, 270, -2)]


def clanks():
    """A short bright clank where the steel edge meets the ground."""
    return pan(stereo(white(), resonances(CLANK_MODES)), 2.0) * blows(CLANKS)


# Light slides of the piece. Each row: start in seconds, attack in seconds, hold in seconds, level in dB.
SLIDES = [(3.69, 0.07, 0.025, -32), (4.035, 0.046, 0.033, -46), (4.47, 0.044, 0.017, -36)]
# Each row: frequency in Hz, level in dB per Hz.
SLIDE_COLOUR = [(350, -60), (600, -22), (1260, -9.5), (1540, -12.5), (2230, -12), (2490, -14.5),
                (3460, -5.5), (4300, -0.5), (5500, 0), (6600, -3), (7970, -2.5), (9650, -3), (13000, -3),
                (15800, -17)]
# Each row: frequency in Hz, width in Hz, level in dB.
SLIDE_MODES = [(3540, 33, -12), (5000, 33, 1), (5520, 35, -5), (5790, 52, -0.5), (7350, 100, 0.5),
               (8070, 68, 2.5), (11130, 150, -12)]
SLIDE_T60_S = 0.14


def slides(sing_db=-4):
    """The piece slips lightly along steel and glove, rasping and singing a little."""
    force = ringing(grit(6000, 1.6), t60=0.076, wet_db=2.5, shift_rate=1.6, uneven_db=1.5)
    song = from_db(sing_db) * singing(SLIDE_MODES, wander_db=4.5, wander_rate=13.0)
    rasp = stereo(force, colour_gain(SLIDE_COLOUR)) + song
    return pan(rasp, 1.2) * gestures(SLIDES, SLIDE_T60_S) * from_db(1.0 * drift(90) - 1.6)


# Boots and things set down.
# Each row: time in seconds, thud level in dB, clack level in dB, time to fall 60 dB in seconds.
KNOCKS = [(2.798, -39, -57, 0.14), (2.83, -53, -70, 0.071), (3.001, -47.5, -64, 0.09),
          (3.631, -55, -49.5, 0.11), (5.734, -43.5, -47.5, 0.061), (5.952, -66, -54, 0.05),
          (5.983, -41.5, -45, 0.057), (6.005, -44.5, -52, 0.049), (6.055, -46, -56, 0.053),
          (6.179, -53, -49.5, 0.091), (6.383, -49.5, -49.5, 0.087), (6.393, -62, -50, 0.054),
          (6.553, -53, -54.5, 0.16), (6.766, -39, -47, 0.081), (6.96, -52, -58, 0.033)]
# Colours of thud and clack. Each row: frequency in Hz, level in dB per Hz.
THUD_COLOUR = [(30, -45), (70, -32), (120, -17), (240, 6.5), (420, -4), (900, -29.5)]
CLACK_COLOUR = [(300, -4.5), (600, -15), (900, 7), (1250, -7), (1800, -4), (4000, -60), (12000, -53.5)]


def knocks():
    """Dull thuds and hollow clacks: bursts of low and middle noise."""
    soft = blows([(s, thud, t60) for s, thud, clack, t60 in KNOCKS])
    soft = uniform_filter1d(soft, size=350)  # rubber soles land softly
    hard = blows([(s, clack, t60) for s, thud, clack, t60 in KNOCKS])
    thuds = stereo(white(), colour_gain(THUD_COLOUR)) * soft
    clacks = stereo(white(), colour_gain(CLACK_COLOUR)) * hard
    return thuds + clacks


# Grit catches and cracks. Each row: time in seconds, level in dB.
TICKS = [(3.1853, -39), (4.3237, -41.5), (4.379, -38.5), (4.8035, -16), (4.926, -15), (5.0773, -10),
         (5.7344, -59), (6.382, -41), (6.769, -31), (7.33, -22)]


def grit_ticks(tick_db=-7, tick_t60=0.016):
    """Grit catches and cracks: very short bright bursts in the colour of the slides."""
    cracks = blows([(s, db + tick_db, tick_t60) for s, db in TICKS])
    return stereo(white(), colour_gain(SLIDE_COLOUR)) * cracks


# Soles dragging on grit. Each row: start in seconds, attack in seconds, hold in seconds, level in dB.
SCUFFS = [(6.37, 0.0078, 0.006, -51.5), (6.778, 0.0067, 0.037, -46), (6.825, 0.012, 0.045, -53),
          (7.252, 0.0039, 0.097, -43.5), (7.315, 0.016, .03, -40.5)]
# Each row: frequency in Hz, level in dB per Hz.
SCUFF_COLOUR = [(210, -44), (350, -9), (602, -5.5), (855, -12), (1070, -2), (2260, -13), (3500, -13.5),
                (5200, -11.5), (6800, -12.5), (9040, -14.5), (11300, -15), (13000, -14), (15800, -38)]
SCUFF_T60_S = 0.17


def scuffs():
    """Soles drag over grit: crackling grains with a short ringing."""
    dragging = ringing(grit(4000, 0.97), t60=0.043, wet_db=8.0, shift_rate=7.2, uneven_db=3.0)
    dragging = dragging * from_db(0.6 * drift(60))
    return stereo(dragging, colour_gain(SCUFF_COLOUR)) * gestures(SCUFFS, SCUFF_T60_S)


# A loose stone knocks on the concrete. Each row: time in seconds, level in dB.
STONE_KNOCKS = [(6.163, -31.5)]
# Each row: frequency in Hz, level in dB, time to fall 60 dB in seconds.
STONE_TONES = [(785, 1, 0.028), (1030, 7.5, 0.019), (1260, -2, 0.026), (1610, -12, 0.02)]


def stone_knock():
    """A loose stone sounds a few short tones as it knocks on the concrete."""
    out = 0
    for s, db in STONE_KNOCKS:
        for hz, mode_db, t60 in STONE_TONES:
            tone = np.sin(2 * np.pi * hz * (TIME - s)) * from_db(db + mode_db)
            out = out + tone * rise(s, attack_s=0.0028) * release(s, t60)
    return out


# Clothes rubbing. Each row: start in seconds, attack in seconds, hold in seconds, level in dB.
RUSTLES = [(6.59, 0.035, 0.16, -62), (6.92, 0.046, 0.28, -66)]
# Each row: frequency in Hz, level in dB per Hz.
RUSTLE_COLOUR = [(400, -13), (900, -4), (1500, -2), (2400, -9.5), (4500, -11.5), (12000, -18), (15800, -28)]


def rustle():
    """Work clothes crease and rub as the worker moves: flickering grains."""
    creases = grit(2500, 1.4) * from_db(2.1 * drift(39))
    return stereo(creases, colour_gain(RUSTLE_COLOUR)) * gestures(RUSTLES, t60=.25)


HUM_HZ, HUM_FAINT_DB, HUM_FULL_DB = 296.4, -64, -52.5
HUM_SWELL_FROM_S, HUM_SWELL_S = 3.9, 1.9  # start and length of the swell


def distant_hum(octave_db=-20):
    """A far machine hums on one note and its octave, swelling from faint to full."""
    angle = 2 * np.pi * HUM_HZ * TIME + 0.067 * drift(4)
    swell_s = [HUM_SWELL_FROM_S, HUM_SWELL_FROM_S + HUM_SWELL_S]
    swell = np.interp(TIME, swell_s, from_db([HUM_FAINT_DB, HUM_FULL_DB]))
    octave = from_db(octave_db) * np.sin(2 * angle + drift(4))
    return np.sqrt(2) * (np.sin(angle) + octave) * swell


# Colour of the outdoor air. Each row: frequency in Hz, level in dB per Hz.
AIR_COLOUR = [(15, -51), (25, -14.5), (55, -21.5), (107, -8.5), (241, -10), (299, -10.5), (352, -11),
              (542, -17), (604, -12.5), (672, -19.5), (1730, -24.5), (3880, -29.5), (13100, -31),
              (14600, -37), (15800, -41.5)]
AIR_DB = -59


def outdoor_air():
    """Steady outdoor air: soft noise, mostly low."""
    return stereo(white(), colour_gain(AIR_COLOUR)) * from_db(AIR_DB)


def scene():
    """All sources together; one rotor speed drives the whole grinder."""
    speed = rotor_speed()
    rotor, disc = rotor_turns(speed)
    halvings = np.log2(OFF_TURNS_PER_S / speed)  # how often the speed has halved since switch-off
    flutter = .45 * drift(35)  # shared by whine and gear tone, in radians
    cut = cutting(disc) + disc_buzz(disc) + cut_singing() + armature_drone(rotor)
    motor = fan_hiss() + gear_rattle(disc, halvings) + air_rush(halvings)
    tones = coasting_whine(rotor, halvings, flutter) + gear_tone(disc, flutter)
    tones = tones + commutator_whistle(rotor) + guard_and_case()
    grinder = cut + motor + tones + dry_bearings() + bearing_squeal() + skid()
    piece = scraping() + free_ring() + clanks() + slides()
    worker = knocks() + grit_ticks() + scuffs() + stone_knock() + rustle()
    return grinder + piece + worker + distant_hum() + outdoor_air()


CUTOFF_HZ = 15600


def record(dry):
    """The top is cut steeply."""
    low_pass = signal.ellip(10, .2, 80, CUTOFF_HZ, fs=SR, output="sos")
    return signal.sosfilt(low_pass, dry)


dry = scene()
out = record(dry)
wrap_up_sound(out)
```